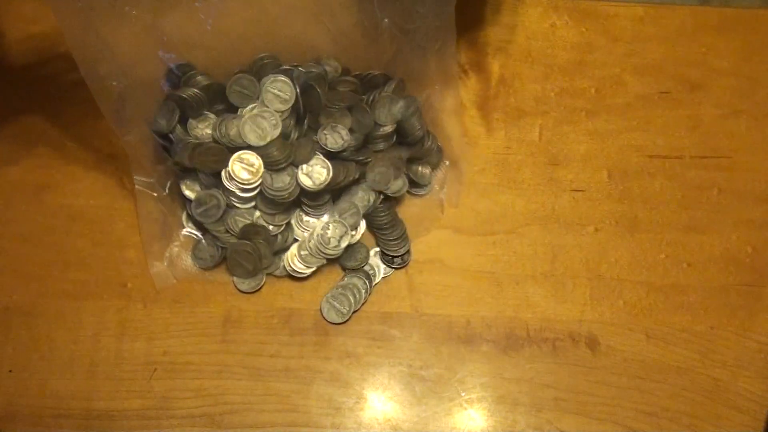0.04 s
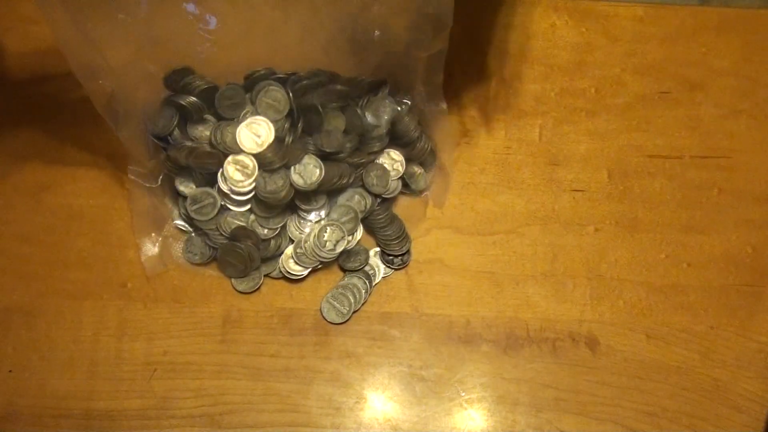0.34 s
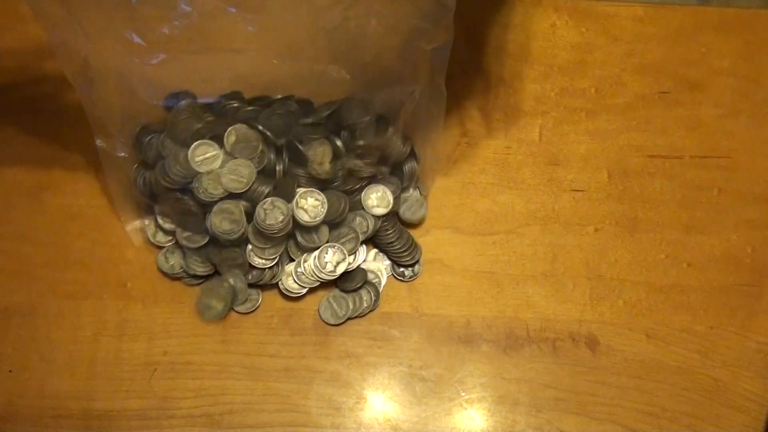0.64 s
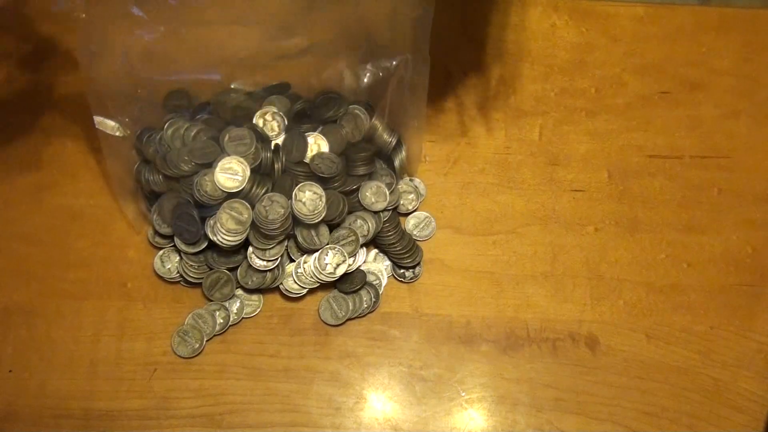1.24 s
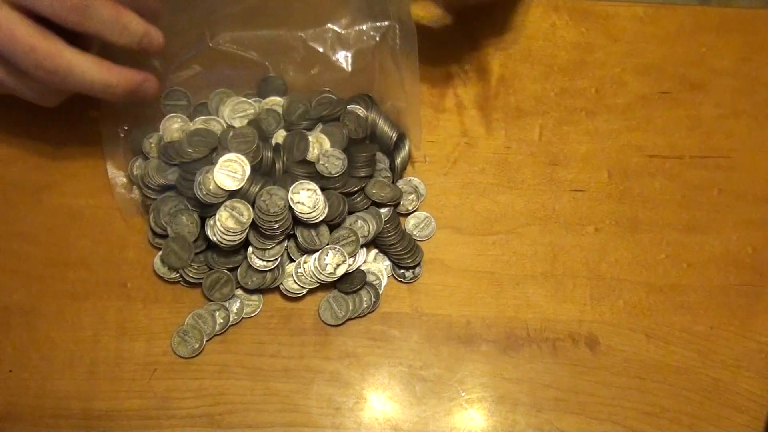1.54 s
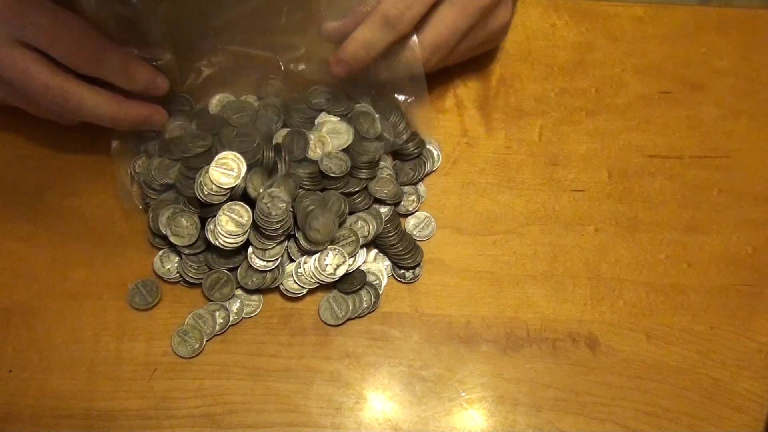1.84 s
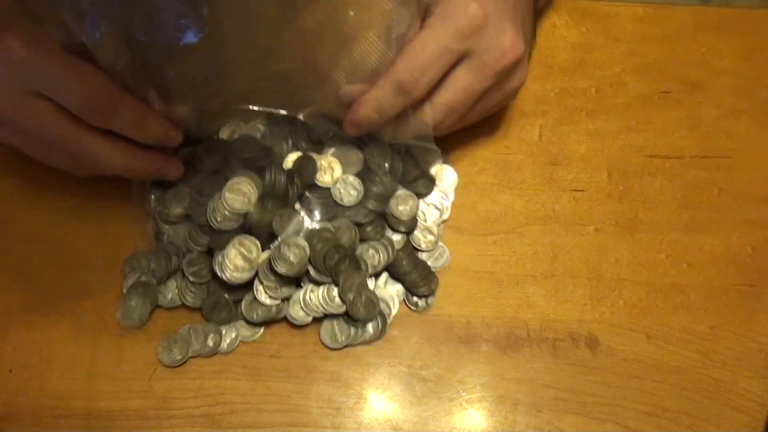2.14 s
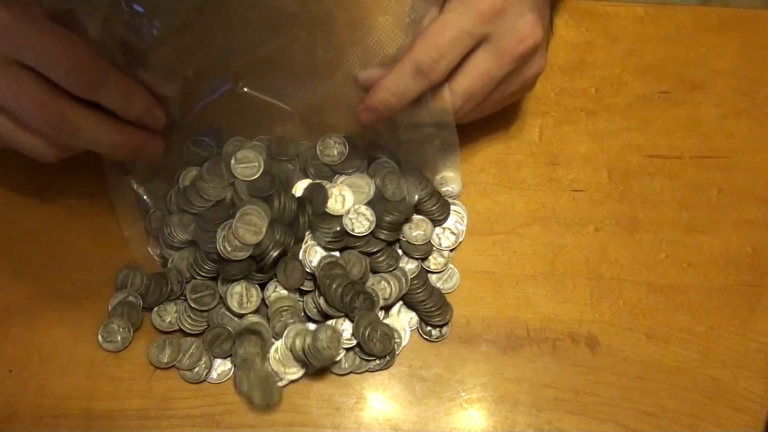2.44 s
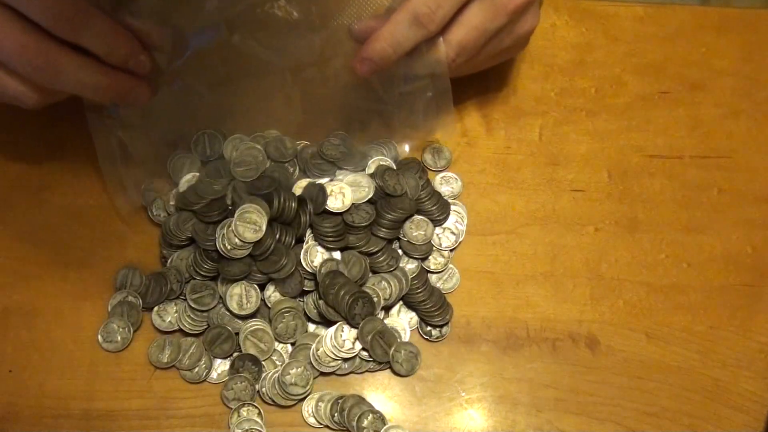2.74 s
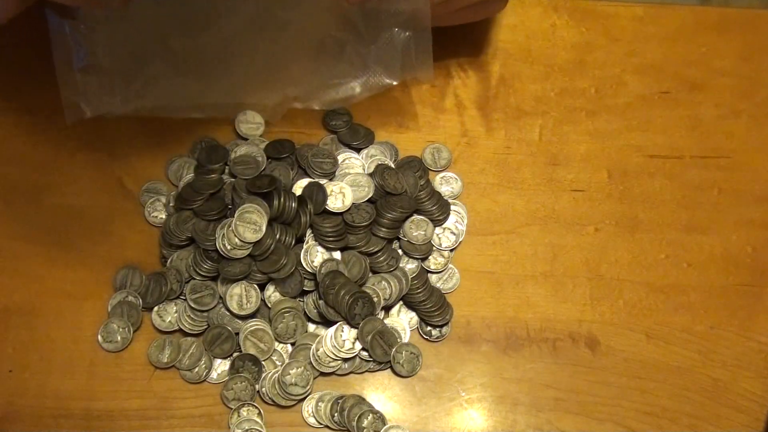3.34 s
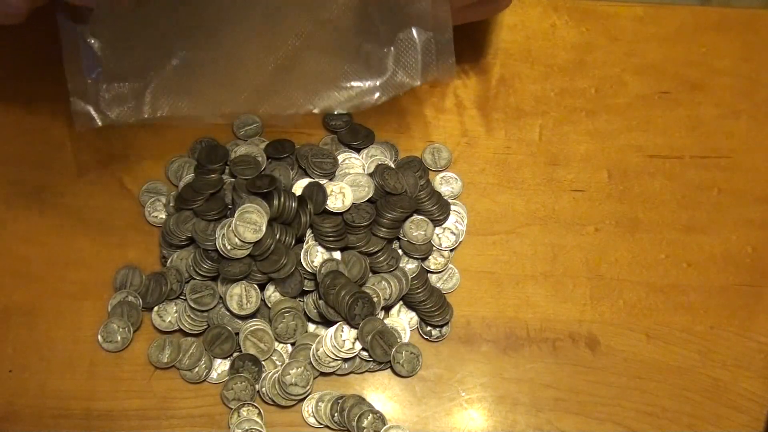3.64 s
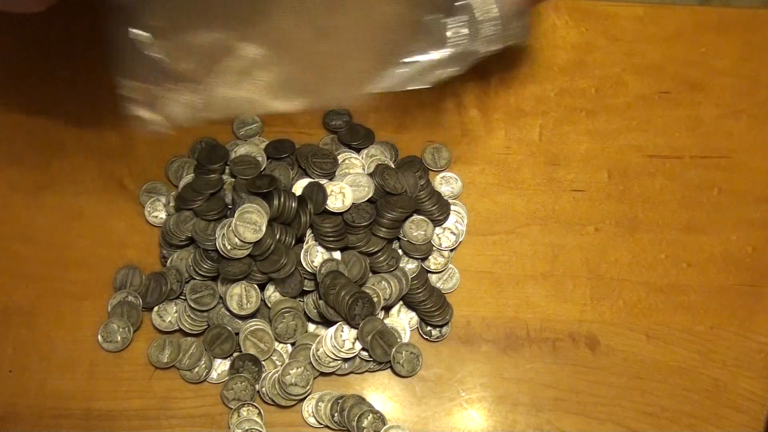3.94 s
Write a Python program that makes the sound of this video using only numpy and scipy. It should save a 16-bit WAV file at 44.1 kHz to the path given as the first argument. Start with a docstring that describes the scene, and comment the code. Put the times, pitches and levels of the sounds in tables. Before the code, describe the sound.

Small metal coins spill from a plastic bag onto a wooden table, clinking in uneven surges with a few plastic snaps. The pour thickens, then one last coin bounces down the pile, heard close up in a small room.

```python
"""A wooden table in a small room, close up: small silver coins slide out of a plastic bag.
The heap spills in surges of tiny clicks and choked rings and thrums the table's modes.
The creased bag snaps as it is pulled. Short pitched knocks and hard coin clinks stand out.
A few coins ring freely in two plate modes. The last one bounces down the pile. Quiet hiss throughout."""
import sys
import numpy as np
from scipy import signal
from scipy.fft import rfft, irfft, next_fast_len
from scipy.io import wavfile
from scipy.ndimage import map_coordinates

SR = 44100
rng = np.random.default_rng(int(sys.argv[2]) if len(sys.argv) > 2 else 0)


def to_wav(s):
    """Save 16-bit WAV."""
    ch = np.atleast_2d(s).T  # columns
    pcm = np.round(np.clip(ch, -1, 1) * 32767)  # PCM
    wavfile.write(sys.argv[1], SR, pcm.astype(np.int16))


N = 176400

# Surges of the spill. Each row: time in seconds, level in dB.
SPILL_LEVEL = [(0, -30.5), (0.13, -36.5), (0.16, -41), (0.24, -49.5), (0.31, -30.5), (0.4, -51),
               (0.445, -31), (0.49, -40), (0.56, -29.5), (0.59, -22), (0.81, -27), (0.85, -39.5),
               (0.94, -48.5), (0.97, -27.5), (1.045, -30.5), (1.07, -46), (1.16, -48), (1.24, -39),
               (1.48, -33.5), (1.6, -40.5), (1.65, -33), (1.715, -24.5), (1.92, -28), (2.16, -26.5),
               (2.23, -36), (2.32, -33), (2.35, -25), (2.48, -28), (2.62, -24), (2.79, -38), (2.85, -28),
               (2.9, -24), (2.99, -37.5), (3.035, -25.5), (3.07, -50), (3.14, -63)]
# Dull clatter against the bright clicks. Each row: time in seconds, offset in dB.
CLATTER_OFFSET = [(0,-0.5),(.98,-4.5),(1.2,-1),(1.75,-5.5),(3.1,-3)]
# Thrum of the table. Each row: time in seconds, level in dB.
THRUM_LEVEL = [(0,-50),(.5,-44),(.6,-30.5),(.92,-55.5),(1.02,-36),(1.13,-59),(1.35,-45.5),(2.26,-43),(2.37,-36.5),(2.6,-39),(3.25,-69)]
# Table top modes. Each row: frequency in Hz, level in dB, T60 in seconds.
TABLE_MODES = [(126.4,-1.5,0.068),(203,-6.5,0.04),(259.5,7,0.15),(308,2.5,0.14),(451,1.5,0.039)]
# Spectra of coin contacts and hiss. Each row: frequency in Hz, gain in dB.
BRIGHT_SPECTRUM = [(300,-56.5),(2000,-1),(5000,-9.5),(9500,4.5),(15500,-8)]
SIZZLE_SPECTRUM = [(4000,-24),(10500,-3),(15500,3.5)]
CLATTER_SPECTRUM = [(150,-23.5),(420,-4),(800,-0.5),(2600,-2),(6000,-7),(12000,-17)]
CLINK_SPECTRUM = [(200,-64),(2000,-5.5),(10500,5.5),(16000,-11)]
HISS_SPECTRUM = [(25,-14),(110,-2.5),(250,-8.5),(1900,-12),(16000,-29)]
# Bag snaps; short pitched knocks and clacks. Each row: start in seconds, peak in dB, resonance in Hz.
BAG_SNAPS = [(.270,-4.5,6540),(.2815,-8,6500),(.3205,-11.5,6950),(.3755,-12,5040),(.4357,-2.5,6600),(3.7916,-11,2880)]
PITCHED_KNOCKS = [(.4357,-18,4050),(1.3135,-11.5,3580),(1.314,-17,1820),(1.553,-22.5,490),(1.653,-16,1300),(1.819,-16.5,1600),(1.851,-15.5,1320),(1.919,-14,1080),(2.022,-14,1320),(2.083,-18,710),(3.1856,-21,4030),(3.792,-28.5,700)]
# Hard coin hits; rim touches of the last coin. Each row: start in seconds, pre-filter level in dB.
HARD_HITS = [(.577,-7),(.963,-11),(1.641,-12.5),(1.709,-14.5),(2.033,-13.5),(2.136,-12),(2.2086,-14),(2.286,-15.5),(2.339,-12),(2.428,-6),(2.513,-7.5),(2.591,-14),(2.7083,-4),(2.834,-14.5),(3.0216,-10),(3.1858,-7),(3.3827,-8.5)]
RIM_TOUCHES = [(3.4215,-25.5),(3.4422,-19),(3.478,-18),(3.5092,-20),(3.539,-18.5),(3.559,-22.5),(3.575,-24.5)]
# Coins free to ring. Each row: start in seconds, high mode in Hz, high mode level in dB,
# low mode level in dB, time until choked in seconds.
FREE_RINGS = [(.722,14055,-24,-14,.025),(.963,14116,-14,-29,.088),(1.785,14405,-21,-32,.1),(2.638,14290,-15,-28,.028),(3.3826,14462,-14.5,-22,.204)]
# Room decay. Each row: frequency in Hz, T60 in seconds.
ROOM_DECAY = [(150,0.14),(4000,0.35),(15000,0.088)]

CLICK_T60_S, RATTLE_T60_S, RATTLE_DB = 0.003, 0.022, -11
TOP_HZ = 15850


def amp(db):
    """dB to gain."""
    return 10 ** (np.asarray(db) / 20)


def unit_rms(x):
    """Scale to RMS 1."""
    return x / np.sqrt(np.mean(x ** 2) + 1e-20)


def at_hz(points, hz):
    """Interpolate (Hz, value) rows on a log axis."""
    point_hz, values = np.transpose(points)
    return np.interp(np.log(hz + 1), np.log(point_hz + 1), values)


def curve(rows):
    """Interpolate (seconds, value) rows per sample."""
    return np.interp(np.arange(N) / SR, *np.transpose(rows))


def decay(t, t60_s):
    """Exponential decay."""
    return np.exp(-np.log(1000) * t / t60_s)


def coloured(x, spectrum, size=4096):
    """Minimum-phase filter with the given spectrum."""
    gain = amp(at_hz(spectrum, np.fft.rfftfreq(size, 1 / SR)))
    cepstrum = irfft(np.log(gain))
    cepstrum[1:size // 2] *= 2
    cepstrum[size // 2 + 1:] = 0
    impulse = irfft(np.exp(rfft(cepstrum)))
    return signal.fftconvolve(x, impulse[None], axes=1)[:, :N]


def add(out, start_s, x, pan_spread=0.033):
    """Mix in a mono sound, panned at random near centre."""
    i = max(0, round(start_s * SR))
    gains = 1 + np.array([[1], [-1]]) * pan_spread * rng.standard_normal()
    out[:, i:i + len(x)] += gains * x[:max(0, N - i)]


def click(t60_s=CLICK_T60_S, rattle_db=RATTLE_DB):
    """A sharp noise crack with a weak, longer rattle."""
    t = np.arange(SR // 20) / SR
    envelope = decay(t, t60_s) + amp(rattle_db) * decay(t, RATTLE_T60_S)
    return unit_rms(envelope * rng.standard_normal(len(t))) * np.sqrt(np.mean(envelope ** 2))


def contact(spectrum, tick_db=-3, tick_t60_s=0.009):
    """Two coins touch: a crack and one brief pitch, both within the spectrum."""
    t = np.arange(SR // 20) / SR
    hz = np.geomspace(spectrum[0][0], TOP_HZ, num=500)
    summed_power = np.cumsum(hz * amp(at_hz(spectrum, hz)) ** 2)
    tick_hz = np.interp(rng.random(), summed_power / summed_power[-1], hz)
    tick = np.sin(2 * np.pi * tick_hz * t) * decay(t, tick_t60_s)
    crack = coloured(click()[None], spectrum)[0, :len(t)]
    return unit_rms(crack) + amp(tick_db) * unit_rms(tick)


def choked_ring(high_hz=14350, low_hz=8380, low_db=-3, t60_s=0.055):
    """Two plate modes of a random coin, damped by its neighbours."""
    t = np.arange(SR // 6) / SR
    detune, low_draw, high_draw, life = rng.standard_normal(4)
    rad_per_hz = 2 * np.pi * t * (1 + 0.011 * detune)
    high = amp(2 * high_draw) * np.sin(high_hz * rad_per_hz)
    low = amp(low_db + 2 * low_draw) * np.sin(low_hz * rad_per_hz)
    return (high + low) * decay(t, t60_s * np.exp(0.6 * life))


def table_thump():
    """The table's modes, struck at a random place."""
    t = np.arange(SR // 5) / SR
    return sum(rng.standard_normal() * amp(db) * np.cos(2 * np.pi * hz * t) * decay(t, t60_s)
               for hz, db, t60_s in TABLE_MODES)


def contact_level_db(chatter_s=0.013):
    """The spill plus the chatter after each hard hit and rim touch."""
    t = np.arange(N) / SR
    power = amp(curve(SPILL_LEVEL)) ** 2
    for hits, chatter_db in ((HARD_HITS, -27), (RIM_TOUCHES, -21)):
        for start_s, db in hits:
            age = np.maximum(t - start_s, 0) / chatter_s
            power += amp(db + chatter_db) ** 2 * age * np.exp(1 - age)
    return 10 * np.log10(power)


def tumble_db(rate_hz=70, depth_db=3.1):
    """Coins tumble in small groups: a quick random level swing."""
    return depth_db * map_coordinates(rng.standard_normal(N // 100), [np.arange(N) * rate_hz / SR])


def shower(hits_per_s, sound, level_db, voice_count=200, spread_db=3.5):
    """Random hits of many different coins, following a level curve."""
    out = np.zeros((2, N))
    voices = [sound() for _ in range(voice_count)]
    voices = [voice / np.linalg.norm(voice) for voice in voices]
    hit_rng = np.random.default_rng(rng.integers(2 ** 31))
    jitter, force, picks = hit_rng.random((int(hits_per_s * N / SR), 3)).T
    starts_s = (np.arange(len(jitter)) + 2 * jitter) / hits_per_s
    sizes = unit_rms(amp(spread_db * np.minimum(-np.log(1 - force), 3)))
    for start_s, size, pick in zip(starts_s, sizes, picks):
        gain = size * np.sqrt(SR / hits_per_s) * amp(level_db[min(int(start_s * SR), N - 1)])
        add(out, start_s, gain * voices[int(pick * voice_count)])
    return out


def expanded_db(db, pivot_db=-27, ratio=1.7):
    """Steepen a level curve: only a fast slide sizzles and rings."""
    return pivot_db + ratio * (db - pivot_db)


def heap():
    """Coins slide over one another, clatter on the wood and thrum the table."""
    flow_db, swing_db = contact_level_db(), tumble_db()
    out = shower(110, choked_ring, expanded_db(curve(SPILL_LEVEL)) - 0.5)
    out += shower(440, lambda: contact(BRIGHT_SPECTRUM), flow_db + swing_db)
    out += shower(440, lambda: contact(SIZZLE_SPECTRUM), expanded_db(flow_db) + swing_db - 2)
    out += shower(420, lambda: contact(CLATTER_SPECTRUM), flow_db + curve(CLATTER_OFFSET))
    low_cut = signal.butter(1, CLATTER_SPECTRUM[0][0], "high", fs=SR)
    return signal.lfilter(*low_cut, out) + shower(180, table_thump, curve(THRUM_LEVEL))


def room_hiss(level_db=-51.5):
    """Steady noise, mostly common to both channels."""
    noise = rng.standard_normal(N) + 0.66 * rng.standard_normal((2, N))
    return amp(level_db) * unit_rms(coloured(noise, HISS_SPECTRUM))


def taps(rows, t60_s, width_hz, rattle_db):
    """Short cracks, each through one broad resonance."""
    out = np.zeros((2, N))
    for start_s, db, hz in rows:
        tap = signal.lfilter(*signal.iirpeak(hz, hz / width_hz, SR), click(t60_s, rattle_db))
        add(out, start_s, amp(db) * tap / np.abs(tap).max())
    return out


def bag_snaps():
    """Creased plastic snaps as it is pulled."""
    return taps(BAG_SNAPS, t60_s=0.0005, width_hz=4700, rattle_db=-18)


def knocks():
    """Short pitched knocks and clacks; one rings near 4 kHz at the moment of the loudest bag snap."""
    return taps(PITCHED_KNOCKS, t60_s=0.02, width_hz=480, rattle_db=RATTLE_DB)


def clinks(ring_db=-17):
    """Hard coin hits: a click and a choked ring."""
    clicks, rings = np.zeros((2, 2, N))
    for start_s, db in HARD_HITS:
        add(clicks, start_s, amp(db) * click())
        add(rings, start_s, amp(db + ring_db) * choked_ring())
    return coloured(clicks, CLINK_SPECTRUM) + rings


def free_coins(mode_ratio=0.5815, t60_s=1, choke_s=0.0017, jostle_hz=110, jostle_depth=0.32):
    """A coin in flight or on edge sings, jostled by the others, until it falls flat."""
    out, t = np.zeros((2, N)), np.arange(SR // 2) / SR
    for start_s, high_hz, high_db, low_db, free_s in FREE_RINGS:
        envelope = decay(t, t60_s) * np.exp(-np.maximum(t - free_s, 0) / choke_s)
        for hz, db in ((high_hz, high_db), (high_hz * mode_ratio, low_db)):
            swell, phase = (jostle_depth * map_coordinates(noise, [t * jostle_hz])
                            for noise in rng.standard_normal((2, len(t))))
            mode = np.exp(swell) * np.sin(2 * np.pi * hz * t + phase)
            add(out, start_s, amp(db) * mode * envelope)
    return out


def wobbling_coin(scrape_s=0.0019):
    """The last coin's milled rim scrapes at each touch: a soft-edged burr."""
    out, t = np.zeros((2, N)), np.arange(SR // 20) / SR
    age = t / scrape_s
    for start_s, db in RIM_TOUCHES:
        add(out, start_s, amp(db) * age * np.exp(1 - age) * rng.standard_normal(len(t)))
    return coloured(out, CLINK_SPECTRUM)


def room_reverb(x, tail_db=-10.5, walls_db=-8, walls_t60_s=0.018, cutoff_hz=7100):
    """Near surfaces reflect first, then the room dies away."""
    hz, t, spectra = signal.stft(rng.standard_normal((3, SR // 2)), SR, nperseg=256)
    tail = signal.istft(spectra * decay(t, at_hz(ROOM_DECAY, hz)[:, None]), SR, nperseg=256)[1]
    walls = rng.standard_normal(tail.shape) * decay(np.arange(tail.shape[1]) / SR, walls_t60_s)
    impulse = amp(tail_db) * tail / np.linalg.norm(tail[0])
    impulse += amp(walls_db) * walls / np.linalg.norm(walls[0])
    stereo = 0.84 * impulse[2] + 0.66 * impulse[:2]  # common part + left, right
    dulled = signal.lfilter(*signal.butter(1, cutoff_hz, fs=SR), stereo)
    delayed = np.pad(dulled, ((0, 0), (SR // 400, 0)))  # 2.5 ms
    return signal.fftconvolve(x, delayed, axes=1)[:, :N]


def scene():
    """Coins and bag in the room, over its hiss."""
    direct = heap() + clinks() + free_coins() + wobbling_coin() + bag_snaps() + knocks()
    return direct + room_hiss() + room_reverb(direct)


def record(dry):
    """Soft-clip the hardest peaks; cut everything above TOP_HZ."""
    ceiling = 0.76
    rounded = dry / (1 + (dry / ceiling) ** 6) ** (1 / 6)
    size = next_fast_len(N + SR // 2)
    passband = np.fft.rfftfreq(size, 1 / SR) < TOP_HZ
    return irfft(rfft(rounded, size) * passband, size)[:, :N]


dry = scene()
out = record(dry)
to_wav(out)
```